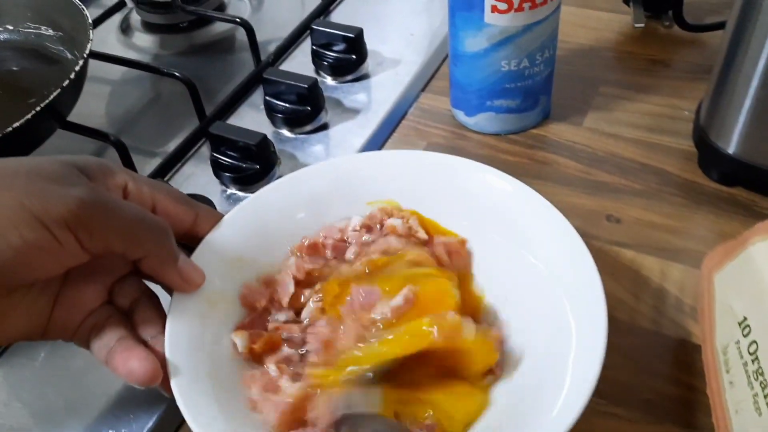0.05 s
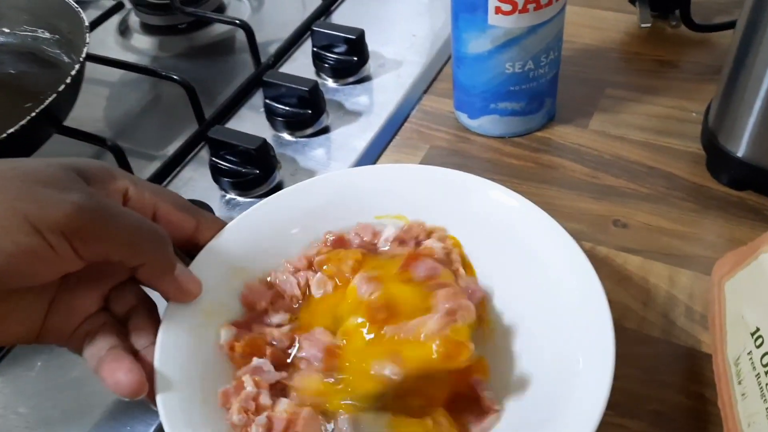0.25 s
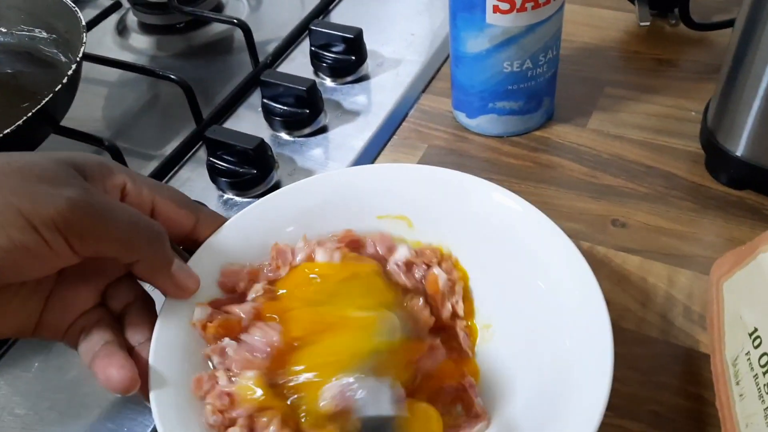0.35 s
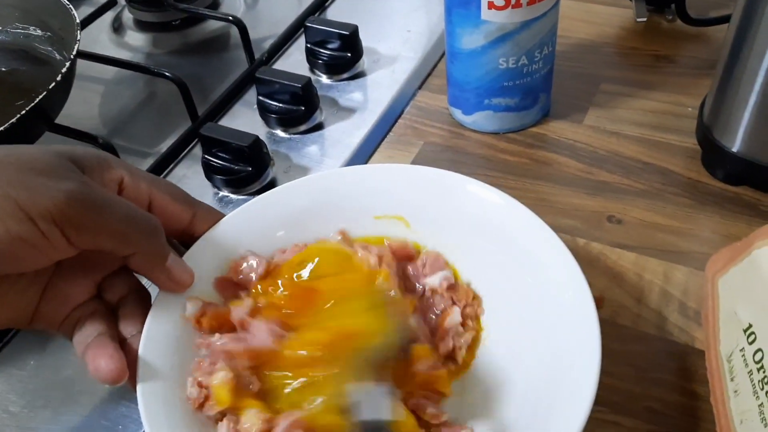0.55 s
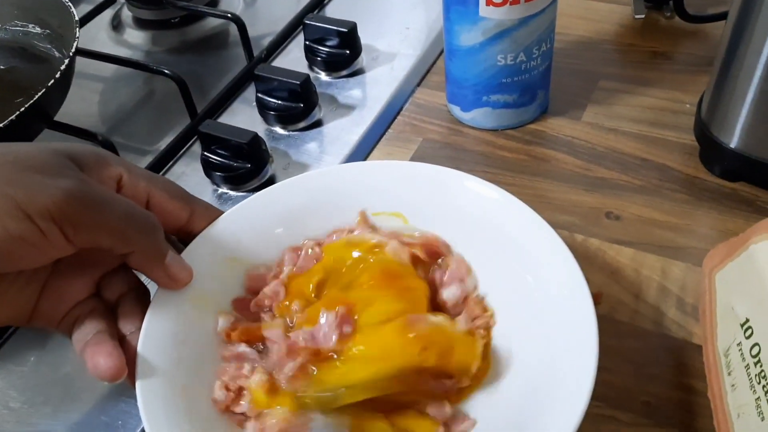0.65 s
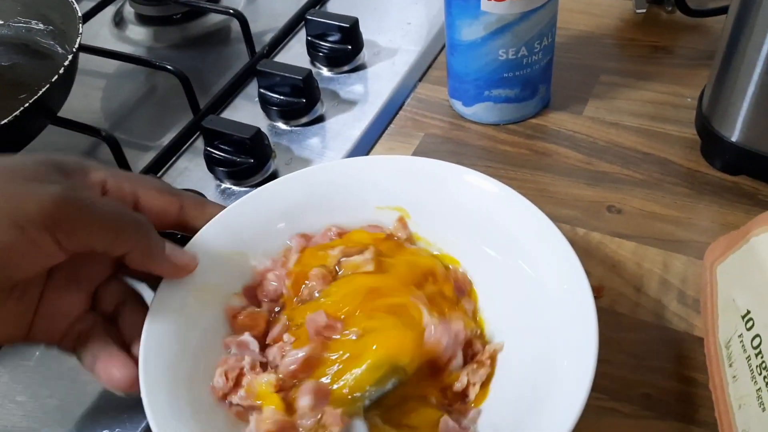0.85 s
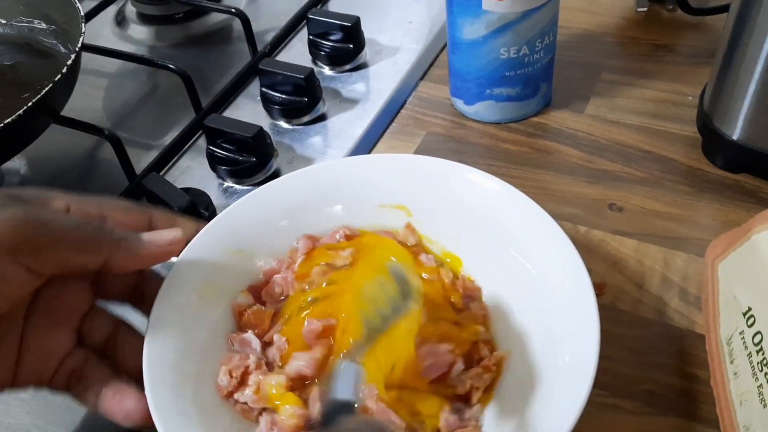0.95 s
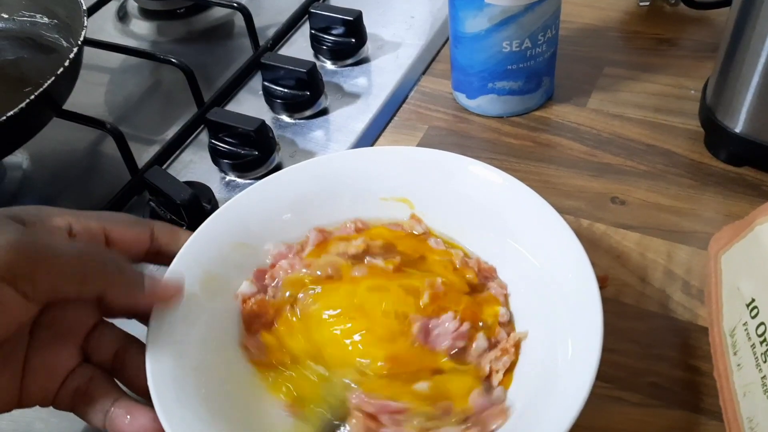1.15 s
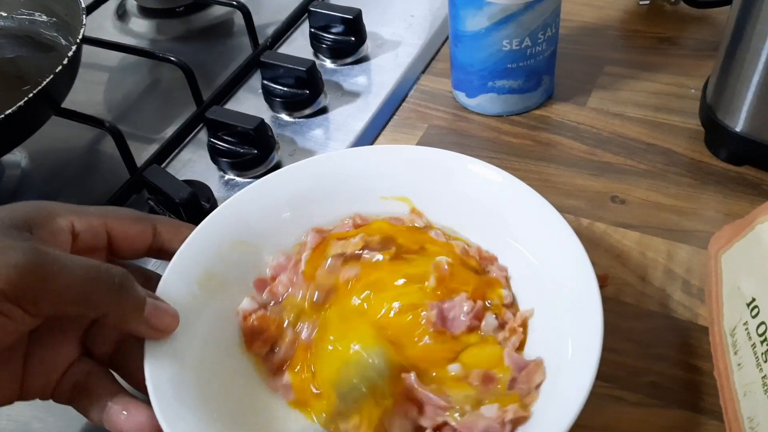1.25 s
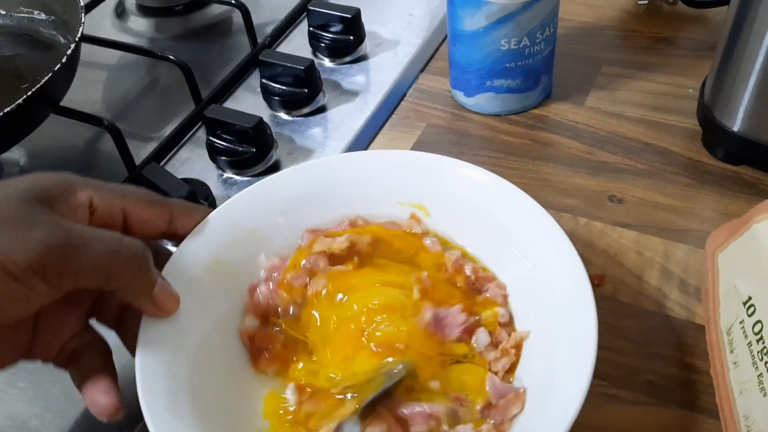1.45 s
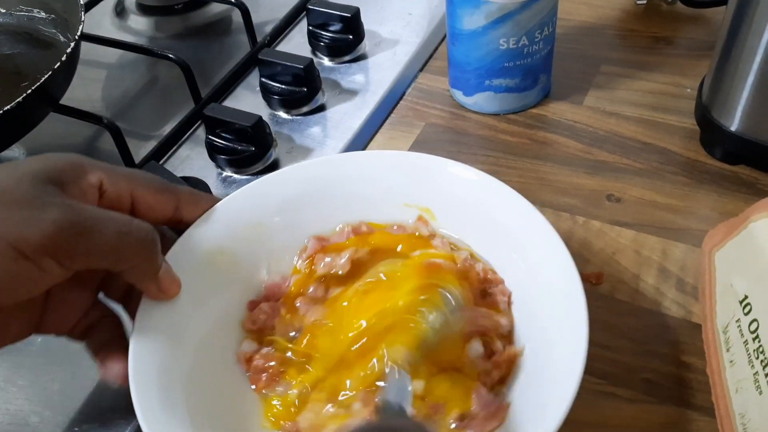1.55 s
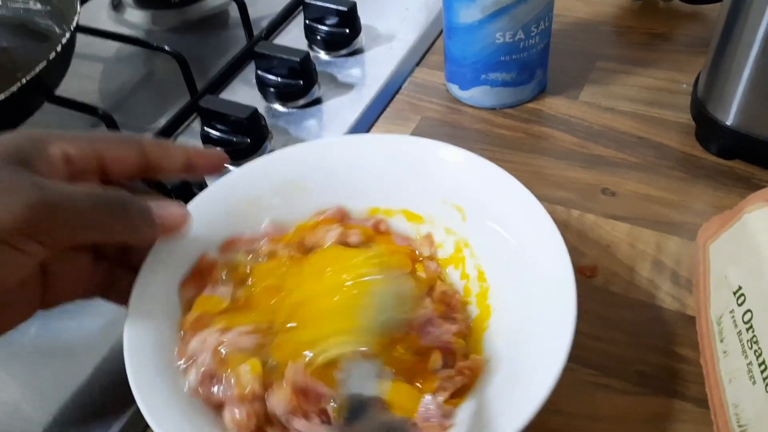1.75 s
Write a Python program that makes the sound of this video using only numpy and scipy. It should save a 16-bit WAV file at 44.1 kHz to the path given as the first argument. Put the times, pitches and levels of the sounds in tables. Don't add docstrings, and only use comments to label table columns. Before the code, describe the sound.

A fork beats eggs and chopped meat in a ceramic bowl, irregular clicks and wet plops strongest in the first second, one ringing rim tap later, close handheld stereo microphone in a small hard kitchen.

```python
import sys
import numpy as np
from scipy import signal
from scipy.io import wavfile

SR = 44100
rng = np.random.default_rng(int(sys.argv[2]) if len(sys.argv) > 2 else 0)


def unload_audio(sound):
    columns = np.transpose(np.atleast_2d(sound))
    steps = np.round(np.clip(columns, -1, 1) * 32767)
    wavfile.write(sys.argv[1], SR, steps.astype(np.int16))


def undo_db(level):
    steps = np.asarray(level, float) / 20
    return 10 ** steps


N = 79380


def at_hz(points, hz):
    pitches, values = np.array(points).T
    return np.interp(np.log(hz), np.log(pitches), values)


def rms_one(x):
    return x / np.sqrt(np.mean(x ** 2) + 1e-20)


def fade(t, t60):
    return undo_db(-60 * t / t60)


def ring(x, hz, t60):
    r, w = fade(1 / SR, t60), 2 * np.pi * hz / SR
    return signal.lfilter([0, np.sin(w)], [1, -2 * r * np.cos(w), r * r], x + 1e-18)


def peak(x, hz, width):
    r = np.exp(-np.pi * width / SR)
    feedback = [1, -2 * r * np.cos(2 * np.pi * hz / SR), r * r]
    return signal.lfilter([(1 - r * r) / 2, 0, (r * r - 1) / 2], feedback, x)


def narrow(x, hz, width):
    return peak(peak(x, hz, width), hz, width)


# pitch in Hz, likeness from -1 to 1.
LEFT_RIGHT_LIKENESS = [(60, 0.88), (200, 0.5), (500, 0.67), (1500, -0.086), (16000, -0.18)]


def bands(size, gain):
    edges = 25 * 2 ** np.arange(0, 9.6, .5)
    out, white = 0, rng.standard_normal((2, 2, size))
    for k, (low, high) in enumerate(zip(edges, edges[1:])):
        band = signal.butter(2, [low, high], "band", fs=SR, output="sos")
        mid, side = signal.sosfilt(band, white[k % 2])
        hz = np.sqrt(low * high)
        alike = np.clip(at_hz(LEFT_RIGHT_LIKENESS, hz), -1, 1)
        stereo = np.sqrt(1 + alike) * mid + np.sqrt(1 - alike) * side * [[1], [-1]]
        out = out + gain(hz) * stereo
    return out


# time in seconds, left over right in dB, lag of the left in ms.
BOWL_BEARING = [(0, 1.5, -0.044), (0.601, 5, -0.136), (1.0, -2, -0.28), (1.252, 10, -0.26),
                (1.5, 0.5, 0.27), (1.8, -1, 0.47)]


def add(out, s, x, pan_db=None):
    at, pans_db, lags_ms = np.transpose(BOWL_BEARING)
    if pan_db is None:
        pan_db = np.interp(s, at, pans_db)
    lag_s = np.interp(s, at, lags_ms) / 1000
    for ch, (side, v) in enumerate(zip((.5, -.5), x * np.ones((2, 1)))):
        start = (s + side * lag_s) * SR
        i = int(start)
        k = np.arange(min(len(v), N - i))
        shifted = np.interp(k - start % 1, np.arange(len(v)), v, left=0)
        out[ch, i:i + len(k)] += undo_db(side * pan_db) * shifted


# pitch in Hz, level in dB.
AIR_COLOUR = [(24, -53), (40, 13.5), (349, -10.5), (2200, -27), (4020, -24.5), (4560, -11), (10800, -16),
              (16500, -35)]
# pitch in Hz, width in Hz, level in dB.
APPLIANCE_HUM = [(114.2, 16, -74), (201.6, 8.7, -69), (312.5, 27, -73.5), (363.5, 17, -70),
                 (2660, 300, -76.5)]


def background():
    air = undo_db(-66) * rms_one(bands(N, lambda hz: undo_db(at_hz(AIR_COLOUR, hz))))
    white = rng.standard_normal((3, N))
    white = white[0] + 0.25 * white[1:]
    hum = sum(undo_db(db) * rms_one(narrow(white, hz, width)) for hz, width, db in APPLIANCE_HUM)
    return air + hum


# time in seconds, level in dB.
STIR_VIGOUR = [(0, -49.5), (0.122, -46.5), (0.216, -52.5), (0.298, -37), (0.416, -54), (0.526, -29.5),
               (.6, -60), (0.718, -57), (.8, -52.5), (0.949, -61.5), (1.048, -80), (1.179, -65.5),
               (1.4, -61), (1.52, -65.5), (1.622, -56.5), (1.7, -52.5), (1.8, -55)]
# pitch in Hz, level in dB.
SQUELCH_COLOUR = [(250, -14), (500, -10), (1200, -12), (2500, -19.5), (5000, -21), (9000, -21.5),
                  (16000, -42)]


def stirring():
    squelch_per_s, squelch_db, smear_db = 1300, -7, -3.5
    sizes = undo_db(0.55 * np.minimum(rng.exponential(1, N), 4)) * rng.choice([-1, 1], N)
    sizes = sizes * (rng.random(N) < squelch_per_s / SR)
    dealt, pans = rng.integers(0, 16, N), rng.normal(0, 8.3, 16)
    grains = 0
    for k, hz in enumerate(np.geomspace(300, 5000, 16)):
        grain = ring(sizes * (dealt == k), hz, 10 / hz)
        grains = grains + grain * undo_db(at_hz(SQUELCH_COLOUR, hz)) * undo_db([[pans[k]], [-pans[k]]])
    smear = bands(N, lambda hz: undo_db(at_hz(SQUELCH_COLOUR, hz)))
    s, db = np.transpose(STIR_VIGOUR)
    vigour = undo_db(np.interp(np.arange(N) / SR, s, db))
    return vigour * (undo_db(squelch_db) * rms_one(grains) + undo_db(smear_db) * rms_one(smear))


# start in seconds, peak level in dB,
# thump into the worktop in dB against that peak, left over right in dB.
TINE_TAPS = [(0.037, -31, -22, 3), (0.0785, -26, -17.5, 2.5), (0.235, -28.5, -16, 20.5),
             (.2378, -16, -12, -4), (0.3578, -39, -5, -6), (0.429, -41, -14, 5), (0.4584, -17.5, -8, 5.5),
             (0.6096, -31.5, -0.5, 2), (0.6867, -22.5, -10.5, 2.5), (0.7979, -37, -15.5, 6),
             (0.8214, -25, -22.5, 3), (0.8236, -24.5, -10, 7), (1.1029, -45.5, -40, 1.5),
             (1.1248, -27, -12, 11.5), (1.2023, -49.5, 0, 5), (1.5768, -60, 16.5, 0),
             (1.6423, -37, -37, 10.5), (1.6891, -44, -20, 2)]
# pitch in Hz, level in dB per Hz.
CRACK_COLOUR = [(350, -4.5), (700, -16), (2370, -1.5), (3350, -11.5), (4600, -10), (6300, 4), (9610, -8.5),
                (14600, 0)]
# pitch in Hz, level in dB, time to fall 60 dB in seconds.
BOWL_MODES = [(2390, -2, .007), (5950, -4, .004), (8540, -7, .004), (1160, -15, .015), (4100, -9, .004),
              (10600, -7, .004)]


def taps():
    rise_s, crack_t60, slide_db, slide_t60 = 0.0012, 0.013, -10, 0.05
    out, t = np.zeros((2, N)), np.arange(SR // 8) / SR
    rise = np.minimum(t / rise_s, 1)
    crack_shape = rise ** 2 * (fade(t, crack_t60) + undo_db(slide_db) * fade(t, slide_t60))
    grit = rms_one(bands(N + SR // 8, lambda hz: undo_db(at_hz(CRACK_COLOUR, hz))))
    spread = rng.normal(0, 1, (len(TINE_TAPS), len(BOWL_MODES), 3, 2, 1))
    for (s, db, _, pan_db), own in zip(TINE_TAPS, spread):
        i = int(s * SR)
        crack = grit[:, i:i + len(t)] * crack_shape
        body = 0
        for (hz, mode_db, t60), (louder, sharper, phase) in zip(BOWL_MODES, own):
            wave = np.sin(2 * np.pi * hz * (1 + 0.0067 * sharper) * t + 2 * phase)
            body = body + undo_db(mode_db + 2 * louder) * wave * fade(t, t60)
        add(out, s - rise_s / 2, undo_db(db + 2.5) * (crack + body * rise), pan_db)
    return out


def pockets(rows, second):
    rise_per_s, attack_s, hold_cycles, second_ratio = 3.53, 0.00092, 1.25, 1.802
    splat_db, splat_hz, splat_longer = -16, 1800, 1.63
    port_turn_per_khz = 0.63
    out, t = np.zeros((2, N)), np.arange(SR // 6) / SR
    size = N + len(t)
    wet = rng.standard_normal(size) * undo_db(0.82 * np.minimum(rng.exponential(1, size), 4))
    splat_band = signal.butter(2, [600, splat_hz], "band", fs=SR, output="sos")
    wet = rms_one(signal.sosfilt(splat_band, wet) + 0.035 * wet)
    for s, db, hz, t60 in rows:
        t60 = max(t60, .004)
        turn = 2 * np.pi * hz * (t + rise_per_s * t * t / 2)
        turn = turn + port_turn_per_khz * min(hz / 1000, .7) * np.array([[.5], [-.5]])
        tone = np.sin(turn) + second * np.sin(second_ratio * turn)
        tone = tone * fade(np.maximum(t - hold_cycles / hz, 0), t60)
        splat = undo_db(splat_db) * wet[int(s * SR):][:len(t)] * fade(t, splat_longer * t60)
        add(out, s, undo_db(db - 1.0) * (tone + splat) * np.minimum(t / attack_s, 1))
    return out


# start in seconds, peak level in dB, pitch in Hz,
# time to fall 60 dB in seconds.
SMALL_BUBBLES = [(.061, -39.5, 1926, 0.046), (.073, -38, 1900, 0.022), (.078, -32, 1416, 0.024),
                 (.078, -30, 2130, 0.013), (.297, -25, 2270, 0.013), (.438, -25.5, 2160, 0.008),
                 (.4435, -31, 2280, 0.014), (.49, -18, 2080, 0.022), (.4985, -13, 1385, 0.019),
                 (.506, -24, 1107, 0.065), (.5175, -19, 1050, 0.019), (.632, -26, 1960, 0.017),
                 (.645, -28, 772, 0.067), (.37, -38.5, 863, 0.028), (.535, -25, 816, .06),
                 (1.165, -43.5, 978, 0.036), (.6855, -11, 2127, .015), (1.123, -37.5, 760, 0.08),
                 (1.658, -46, 4530, 0.035), (.686, -14.5, 1165, 0.015), (.712, -23, 2270, 0.034),
                 (.8135, -29.5, 933, 0.048), (.8165, -25, 910, 0.013), (.086, -38, 1416, 0.032),
                 (1.4, -59, 760, 0.19), (1.104, -46, 970, 0.1), (1.255, -51.5, 1014, 0.042),
                 (1.299, -51, 2200, .02), (1.525, -44, 1110, 0.014), (1.577, -42.5, 2590, .01)]


def bubbles():
    return pockets(SMALL_BUBBLES, 0)


def scrapes(rows, skew):
    clicks_per_s = 2200
    out, shape = np.zeros((2, N)), (3, 2 * N)
    clicks = rng.standard_normal(shape) * undo_db(4.8 * rng.standard_normal(shape))
    clicks = clicks * (rng.random(2 * N) < clicks_per_s / SR)
    clicks = 0.42 * clicks[0] + clicks[1:]
    for s, length, hz, width, db in rows:
        size = int(length * SR)
        rough = rms_one(narrow(clicks[:, int(s * SR):][:, :size], hz, width))
        stroke = np.sin(np.pi * np.linspace(0, 1, size) ** skew)
        add(out, s, undo_db(db) * rough * stroke)
    return out


# start in seconds, length in seconds, pitch in Hz,
# width in Hz, level in dB.
SOFT_SWISHES = [(.24, 0.067, 10800, 7100, -56), (0.351, 0.034, 5100, 4000, -46),
                (0.455, 0.068, 12100, 7000, -53), (.525, 0.012, 11200, 7930, -56),
                (0.067, 0.087, 2003, 1500, -50.5), (0.069, .03, 6600, 6000, -42),
                (0.681, 0.017, 6300, 5340, -32.5), (0.804, 0.024, 2080, 1180, -41.5),
                (1.113, 0.038, 4000, 5000, -44.5), (1.64, 0.066, 8700, 5000, -56.5),
                (.9, 0.082, 10000, 7940, -67.5), (1.114, 0.096, 4070, 2530, -52),
                (1.47, 0.031, 6620, 400, -63), (1.573, 0.22, 3856, 121, -62.5),
                (1.587, 0.23, 4360, 1470, -57), (1.629, 0.092, 1140, 200, -57.5)]


def swishes():
    return scrapes(SOFT_SWISHES, 0.66)


# start in seconds, peak level in dB, pitch in Hz,
# time to fall 60 dB in seconds.
EGG_PLOPS = [(0.101, -37.5, 384, 0.15), (0.247, -14, 409, 0.014), (.2495, -19.5, 417, 0.011),
             (.55, -29.5, 333, 0.18), (1.36, -59.5, 316, .2), (0.2575, -21, 392, 0.043),
             (0.3635, -29.5, 313, 0.03), (.4125, -43, 344, 0.04), (.4987, -9.5, 625, 0.038),
             (.4995, -13, 331, 0.043), (.5065, -16, 512, 0.013), (.5165, -16, 570, .015),
             (0.544, -26, 605, 0.043), (.6408, -20.5, 366, 0.063), (.6412, -22, 482, 0.035),
             (.648, -24, 567, 0.039), (.694, -30.5, 598, 0.046), (.502, -22, 209.5, 0.059),
             (.371, -29, 352, 0.045), (0.692, -25.5, 339, 0.096), (0.925, -36, 319, 0.024),
             (1.126, -32, 328, 0.062), (1.165, -41, 287, 0.034), (1.212, -48, 307, 0.043),
             (1.253, -55, 315, 0.029), (1.531, -40.5, 411, 0.0627), (1.545, -41, 324, 0.11),
             (1.571, -48.5, 329, 0.035), (1.587, -45, 326, 0.034), (1.708, -46.5, 385, .05),
             (1.62, -40.5, 363, 0.027), (1.637, -42, 379, 0.073), (1.738, -46, 410, 0.078),
             (1.774, -43, 367, 0.22)]


def egg_plops():
    return pockets(EGG_PLOPS, undo_db(-11.5))


# pitch in Hz, level in dB, time to fall 60 dB in seconds.
WORKTOP_MODES = [(199.2, -5.5, 0.095), (338.5, -6.5, 0.14), (461, -15, .15), (595.3, -17.5, 0.18),
                 (762, -28, 0.12), (829, -20.5, 0.19), (997.4, -11, 0.36)]


def worktop(plops):
    boom_hz, boom_db, boom_late_s, boom_swell_s, boom_t60 = 107.5, -5.5, .012, 0.022, 0.15
    push = np.zeros(N)
    for s, db, thump_db, *_ in TINE_TAPS:
        push[int(s * SR)] = undo_db(db + thump_db)
    push = signal.lfilter([.05], [1, -.95], push)
    swell = ring(np.roll(push, int(boom_late_s * SR)), boom_hz, np.log(1000) * boom_swell_s)
    boom = ring(swell, boom_hz, boom_t60) / (boom_swell_s * SR / 4)
    shake = push + undo_db(-46.5) * plops
    return undo_db(boom_db) * boom + sum(undo_db(db) * ring(shake, hz, t60) for hz, db, t60 in WORKTOP_MODES)


# start in seconds, length in seconds, pitch in Hz, width in Hz.
GLAZE_DRAGS = [
    (.465, .10, 2300, 900),
    (.495, .07, 4200, 2000),
    (.607, .04, 3800, 1600),
    (.683, .08, 2200, 600),
    (1.01, .045, 3950, 150),
    (1.125, .12, 735, 70),
    (1.52, .33, 400, 250),
]
GLAZE_DRAG_DB = [-35.5, -43, -39.5, -37, -68.5, -48, -66]


def glaze_drags():
    rows = [(*drag, db) for drag, db in zip(GLAZE_DRAGS, GLAZE_DRAG_DB)]
    return scrapes(rows, 0.19)


# pitch in Hz, level in dB, time to fall 60 dB in seconds.
FORK_MODES = [(6270, 11, 0.029), (5800, -24.5, 0.23), (6240, -24, 0.45), (6470, -35, 0.41), (6435, -35, .3),
              (6760, -37, .23)]


def fork():
    start_s, level_db, pan_db, attack_s = 1.1245, -17.5, -4, 0.0021
    out, t = np.zeros((2, N)), np.arange(SR // 2) / SR
    tone = sum(undo_db(db) * np.sin(2 * np.pi * hz * t) * fade(t, t60) for hz, db, t60 in FORK_MODES)
    add(out, start_s, undo_db(level_db) * tone * np.minimum(t / attack_s, 1), pan_db)
    return out


# pitch in Hz, time to fall 60 dB in seconds.
ROOM_DECAY = [(100, 0.49), (300, 0.42), (800, 0.39), (2000, 0.36), (5000, 0.32), (13000, 0.23)]


def kitchen(x):
    level_db, tilt_db_per_octave, onset_s = -3, 2, 0.0029
    t = np.arange(SR // 2) / SR

    def decay(hz):
        return fade(t, at_hz(ROOM_DECAY, hz)) * undo_db(tilt_db_per_octave * np.log2(hz / 1000))

    tail = bands(len(t), decay) * np.minimum(t / onset_s, 1) ** 2
    tail = rms_one(tail) / np.sqrt(len(t))
    return undo_db(level_db) * signal.fftconvolve(x[None], tail, axes=1)[:, :N]


def scene():
    plops = egg_plops()
    near = stirring() + taps() + bubbles() + swishes() + plops
    near = near + worktop(plops.mean(0)) + glaze_drags() + fork()
    return near + kitchen(near.mean(0)) + background()


# pitch in Hz, width in Hz, depth from 0 to 1.
PORT_NOTCHES = [(9550, 550, 0.72), (3150, 300, 0.03), (6795, 270, 1)]


def microphone_ports(x):
    for hz, width, depth in PORT_NOTCHES:
        x = x - np.clip(depth, 0, 1) * peak(x, hz, width)
    return x


def band_limit(x):
    return signal.sosfilt(signal.butter(12, 16960, fs=SR, output="sos"), x)


def record(dry):
    mix = microphone_ports(dry)
    mix = signal.sosfilt(signal.cheby2(12, 22, 16100, fs=SR, output="sos"), mix)
    mix = signal.sosfilt(signal.butter(3, 72, "high", fs=SR, output="sos"), mix)
    mix = signal.sosfilt(signal.cheby2(12, 50, 17250, fs=SR, output="sos"), mix)
    return band_limit(mix)


dry = scene()
out = record(dry)
unload_audio(out)
```